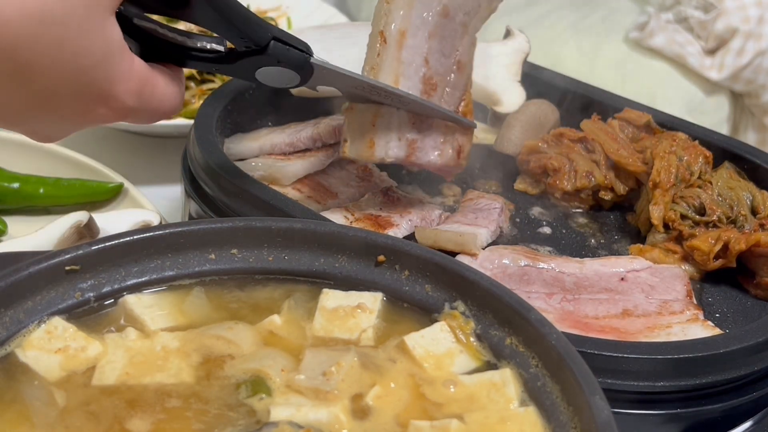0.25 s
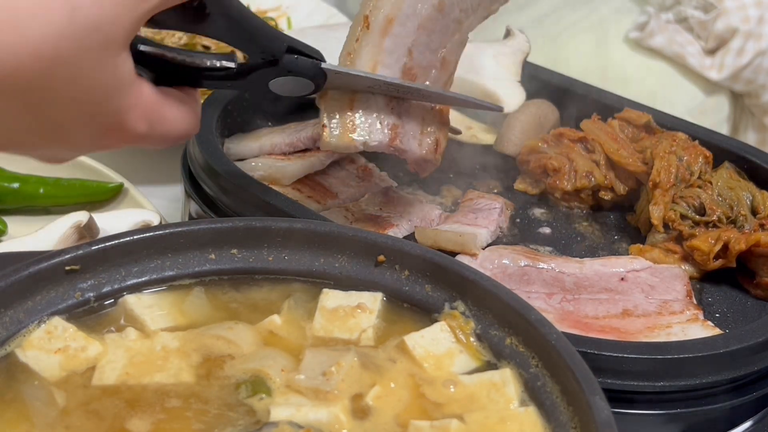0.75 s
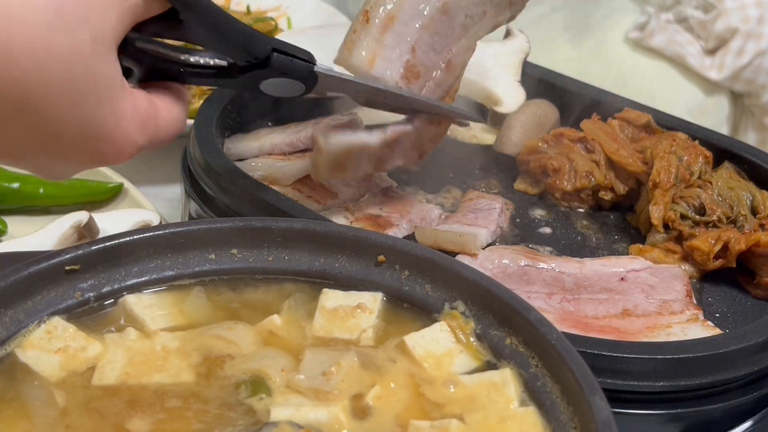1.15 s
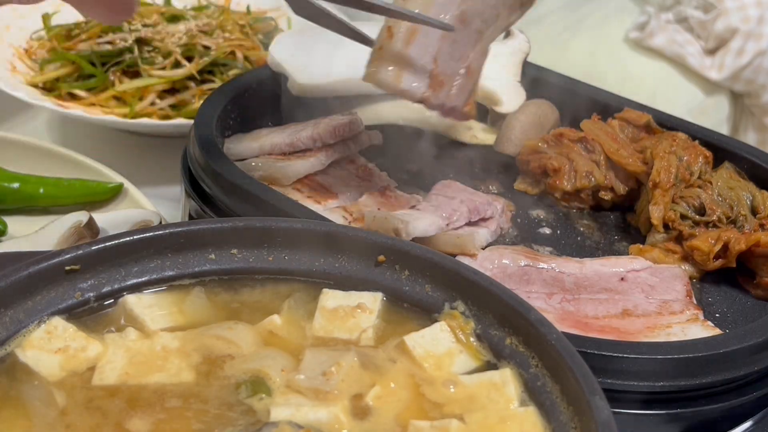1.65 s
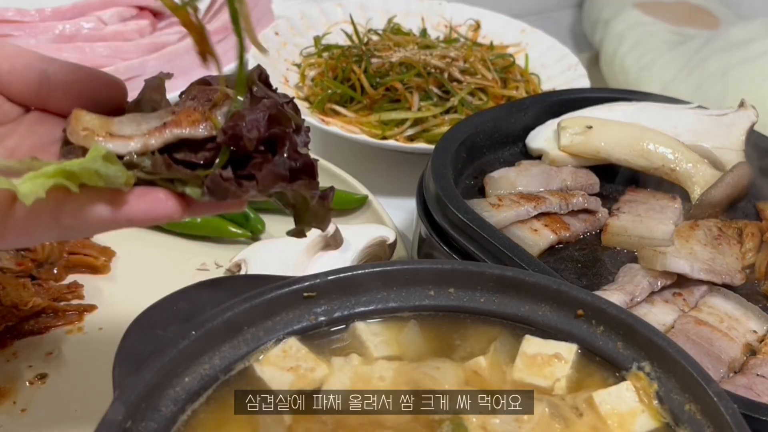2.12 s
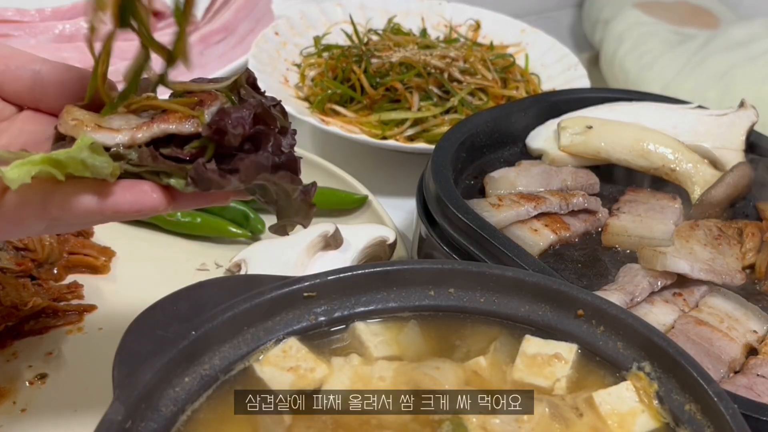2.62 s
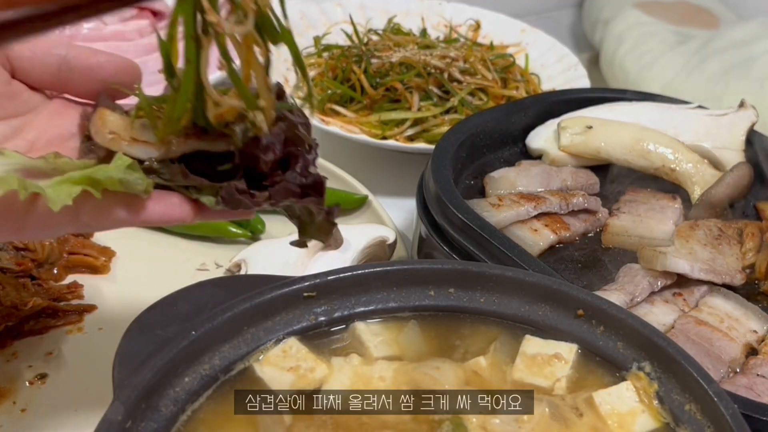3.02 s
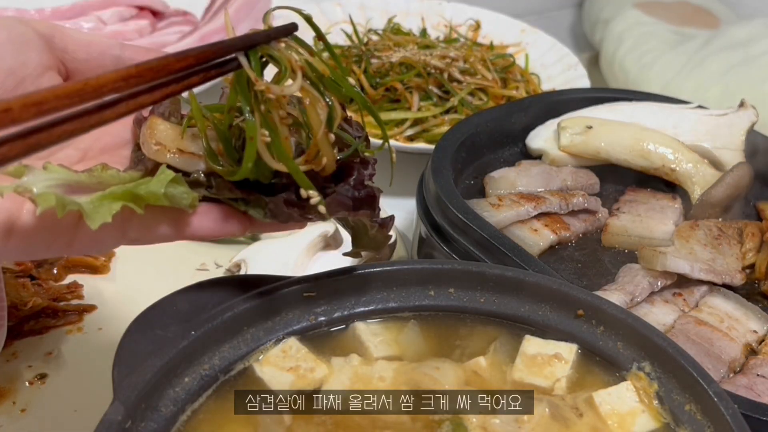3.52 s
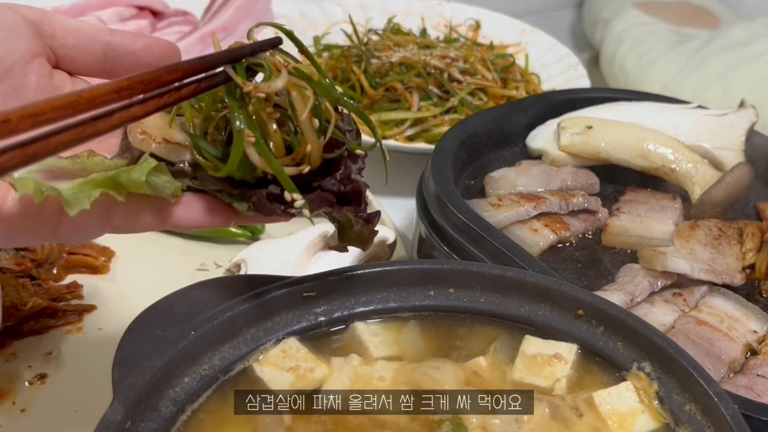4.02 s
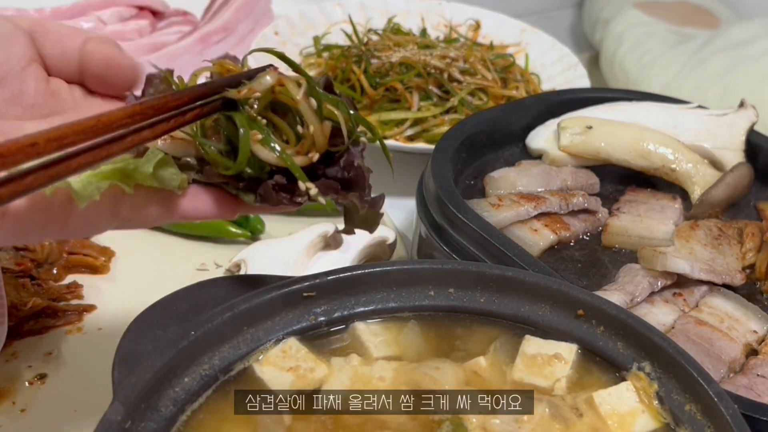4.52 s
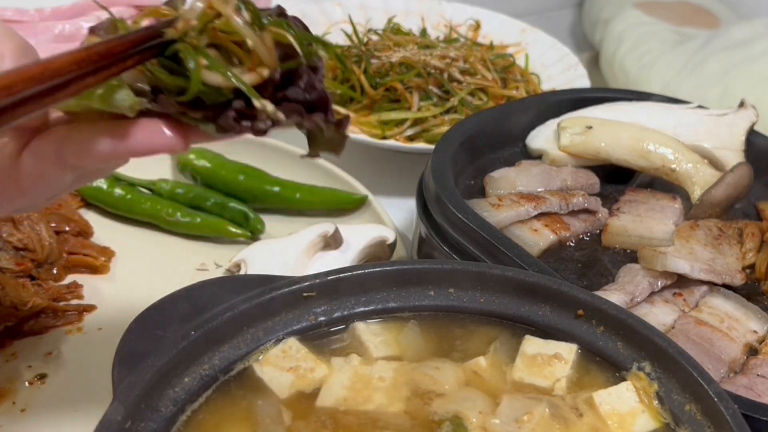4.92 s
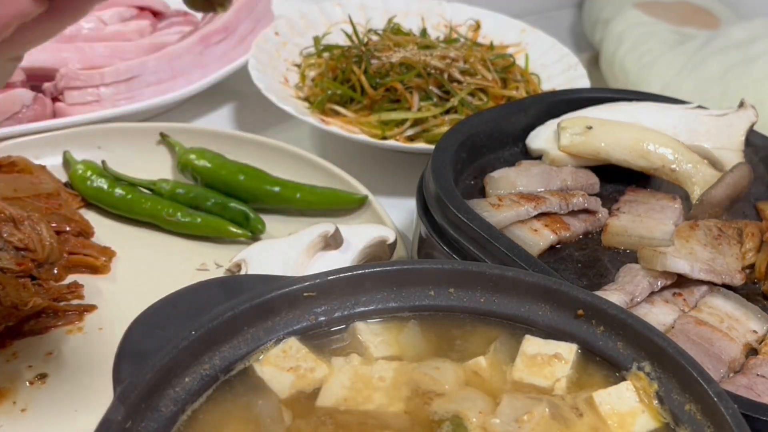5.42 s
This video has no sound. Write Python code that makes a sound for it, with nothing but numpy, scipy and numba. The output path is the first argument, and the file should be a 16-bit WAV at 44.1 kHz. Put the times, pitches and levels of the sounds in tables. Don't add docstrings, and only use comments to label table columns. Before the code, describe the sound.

Pork fat sizzles briskly up close with wet spits and pops, then abruptly drops to a softer, ticking crackle from across the table.

```python
import sys
import numpy as np
from scipy import signal
from scipy.fft import rfft, irfft
from scipy.io import wavfile
from scipy.ndimage import uniform_filter1d
from numba import njit

SR = 44100
rng = np.random.default_rng(int(sys.argv[2]) if len(sys.argv) > 2 else 0)


def dump(signal):
    limited = np.clip(np.atleast_2d(signal).T, -1, 1)
    pcm = np.round(limited * 32767).astype(np.int16)
    wavfile.write(sys.argv[1], SR, pcm)


def invert_db(level):
    return 10 ** (np.asarray(level, dtype=float) / 20)


N = 249606
CHANGE_S = 1.7692


def level(x, db):
    return x * invert_db(db) / np.sqrt(np.mean(x ** 2))


def colour(x, points):
    hz, db = np.transpose(points)
    f = np.fft.rfftfreq(2048, 1 / SR)
    log_gain = np.interp(np.log(f + 1), np.log(hz), db) * np.log(10) / 20
    cepstrum = irfft(log_gain)
    cepstrum[1:1024] *= 2
    cepstrum[1025:] = 0
    response = irfft(np.exp(rfft(cepstrum)))[:1024]
    return signal.fftconvolve(x, response)[:N]


@njit
def rings(start, hz, t60, size, n):
    out = np.zeros(n)
    for k in range(len(start)):
        turn = np.exp((2j * np.pi * hz[k] - np.log(1000) / t60[k]) / SR)
        z = size[k] + 0j
        end = min(n, start[k] + int(t60[k] * SR) + 1)
        for i in range(start[k], end):
            out[i] += z.real
            z *= turn
    return out


def walk(rate):
    hold = int(SR / rate)
    steps = np.repeat(rng.standard_normal(N // hold + 1), hold)
    return 1.3 * uniform_filter1d(uniform_filter1d(steps, hold), hold)[:N]


def smear(x, t60, db):
    t = np.arange(1, 2000) / SR
    tail = level(rng.standard_normal(len(t)) * 1000 ** (-t / t60), -28.0)
    return x + invert_db(db) * signal.fftconvolve(x, tail)[:N]


def bubbles(count, cycles, spread_db, patchy_db):
    when, pitch, big, sign = rng.random((count, 4)).T
    start = (when * N).astype(int)
    hz = 600 + pitch * 16500
    flurry = 1.17 * walk(30) + walk(90)
    burst_db = -spread_db * np.log(1 - big) + patchy_db * flurry[start]
    size = invert_db(np.minimum(burst_db, 16)) * np.sqrt(hz)
    return level(rings(start, hz, cycles / hz, size * np.sign(sign - .5), N), 0)


def frying_layers():
    hiss = rng.standard_normal(N) * invert_db(2.0 * walk(40))
    fizz = bubbles(count=30000, cycles=7.3, spread_db=2.0, patchy_db=0.5)
    crackle = smear(bubbles(count=4000, cycles=2.3, spread_db=2.0, patchy_db=1.5), 0.004, -3.5)
    ticks = smear(bubbles(count=2500, cycles=6.2, spread_db=3.5, patchy_db=1.0), 0.0025, -18.5)
    return np.array([hiss, fizz, crackle, ticks])


# time in seconds, level in dB, treble lift in dB.
FAT_HEAT = [
    [(0.0, -35, 3), (0.294, -36.5, 2), (1.602, -34.5, 1.5), (1.734, -35, 2.5), (1.76, -35, 1)],
    [(1.8, -49.5, -1), (2.51, -50.5, 1), (2.7, -50, -0.5), (3.79, -50.5, -1.5), (4.16, -49.5, 0.5),
     (4.69, -51, 2), (5.66, -49, -1)],
]
# pitch in Hz, strength in dB per Hz.
COLOUR_NEAR = [(150, -15.5), (500, -16.5), (1000, -8), (1500, -3), (1750, 2), (2400, -0.5), (3200, 4.5),
               (3700, 0), (5000, 1.5), (6300, -2.5), (8500, 2), (11000, -1), (13000, -2), (15500, 1.5)]
# pitch in Hz, strength in dB per Hz.
COLOUR_FAR = [(150, -50), (1050, -10), (1280, 3.5), (1550, 4), (2200, 0.5), (2900, 0), (4500, 2.5),
              (6000, 0), (8000, 1), (10000, 0.5), (12000, -2.5), (12900, -5.5), (14200, -2.5),
              (15500, -0.5)]
# hiss, fizz, crackle and ticks, all in dB.
LAYER_MIX = [(-3, -2.5, -7, -14), (-5.5, -3, -3, -4)]


def frying(place, layers):
    t = np.arange(N) / SR
    s, heat_db, lift_db = np.transpose(FAT_HEAT[place])
    heat = invert_db(np.interp(t, s, heat_db) + 6.5)
    lift = invert_db(np.interp(t, s, lift_db))
    mixed = invert_db(np.array(LAYER_MIX[place])) @ layers
    fat = level(colour(mixed, (COLOUR_NEAR, COLOUR_FAR)[place]), 0)
    high_pass = signal.butter(2, 7500, "high", fs=SR, output="sos")
    treble = signal.sosfiltfilt(high_pass, fat)
    return heat * (fat + (lift - 1) * treble)


# pitch in Hz, strength in dB per Hz.
ROOM_COLOUR = [(100, -2), (200, -2), (350, -4.5), (600, -4), (1000, -1), (1500, -10), (3000, -28)]


def room_hum():
    return colour(rng.standard_normal(N), ROOM_COLOUR)


# time in seconds, force in dB, length of the push in milliseconds.
FOOTFALLS = [(0.471, -48, 8.2), (.76, -46, 9.3), (0.998, -49.5, 8.9), (1.221, -62, 5.6),
             (1.377, -41.5, 5.1), (1.68, -57, 8.7), (3.674, -56, 2.8), (3.71, -55, 5.9), (4.83, -63, 6),
             (4.91, -55, 3), (4.954, -42.5, 8.2), (5.442, -67, 4)]


def shudder(t):
    rest_near_db, rest_far_db = -61, -65.5
    after_db, settle_t60_s = -13, 1.9
    power = invert_db(np.where(t < CHANGE_S, rest_near_db, rest_far_db)) ** 2
    for s, db, ms in FOOTFALLS:
        tremble_db = db + after_db - 60 * np.abs(t - s) / settle_t60_s
        power = power + (t > s) * invert_db(tremble_db) ** 2
    return np.sqrt(power)


# pitch in Hz, level in dB, time to fade by 60 dB in seconds.
BOOM_NOTES = [(27.1, -7.5, 2.1), (28, -11, 2.3), (50.1, -2, 0.83), (56.16, 0, 1.3), (78.7, 1.5, 1.2),
              (85.34, 1, 0.87), (108, 1.5, 0.61), (144, 4, 0.18), (185, -5, 0.12)]


def floor(heard):
    t = np.arange(N) / SR
    push = rng.standard_normal(N) * shudder(t) * invert_db(-39.5)
    for s, db, ms in FOOTFALLS:
        push = push + invert_db(db - 0.5) * np.exp(-(2000 * (t - s) / ms) ** 2) * 2000 / (ms * SR)
    boom = np.zeros(N)
    for k, (hz, db, t60) in enumerate(BOOM_NOTES):
        pole = np.exp((2j * np.pi * hz - np.log(1000) / t60) / SR)
        ring = signal.lfilter([1], [1, -pole], push * heard).imag
        boom = boom + (-1) ** k * invert_db(db) * ring
    lean_db = .3
    return boom * invert_db(np.array([[lean_db], [-lean_db]]))


def spits(rows):
    s, db, hz, slap_db, splash_db, spray_db = np.transpose(rows)
    start = (s * SR).astype(int) + 20
    one = np.ones(len(s))

    def burst(burst_db, t60):
        puff = rings(start, 0 * one, t60 * one, invert_db(db + burst_db), N)
        return uniform_filter1d(puff, size=19, origin=9) * np.sign(rng.standard_normal(N))

    slap = burst(1.65 * slap_db + 34.0, 0.021)
    slap = colour(slap, [(150, -15.5), (350, -8.0), (1300, -5.5), (2500, -24)])
    splash = burst(splash_db + 11.5, 0.0045)
    splash = colour(splash, [(600, -29), (1600, -1), (4000, -3.5), (7000, -18.0), (10000, -30)])
    spray = colour(burst(spray_db + 8, 0.0056), [(3000, -19), (7000, 2.5), (10000, 2.5)])
    ring = rings(start + 10, hz, 0.0053 + 8 / hz, invert_db(db - 7), N)
    ring = colour(ring, [(300, -22), (1200, 1.0)])
    snap = rings(start + 10, 0 * one, 1e-5 * one, invert_db(db - 10 + (splash_db + 9)), N)
    snap = colour(snap, [(500, -18), (1600, -7), (6000, 1), (12000, -12)])
    return smear(slap + splash + spray + ring + snap, 0.036, -14.5)


# share of a 4 kHz bubble in dB, change in dB per octave
# (wider bubbles ring lower and splash more), change in dB per dB of slap.
SPLASH_SHARE = [(-8, -1.5, 0), (-12.5, -1.5, .5)]


def with_splash(place, *tables):
    s, db, hz, slap_db, spray_db = np.vstack(tables).T
    base_db, octave_db, wet = SPLASH_SHARE[place]
    splash_db = base_db + octave_db * np.log2(hz / 4000) + wet * (slap_db + 26)
    return np.transpose([s, db, hz, slap_db, splash_db, spray_db])


# peak, scatter, slap and spray, all in dB.
SMALL_SPITS = [(-21.5, -2.5, -22.5, -25), (-39, 6, -29, -9.5)]
# five pitches in Hz, first near and then far.
HOLLOWS = [(2000, 3000, 2800, 6200, 5300), (1450, 1960, 4700, 4600, 5200)]


def small_spits(place, start_s, end_s, count):
    when, pick = rng.random((count, 2)).T
    loud, detune, slap, spray = rng.standard_normal((count, 4)).T
    db, scatter_db, slap_db, spray_db = SMALL_SPITS[place]
    hollows = np.array(HOLLOWS[place])
    hz = hollows[(pick * len(hollows)).astype(int)] * (1 + .05 * detune)
    return np.transpose([start_s + when * (end_s - start_s),
                         db + scatter_db * np.minimum(loud, 1),
                         hz,
                         slap_db + 5.0 * np.minimum(slap, .5),
                         spray_db + 2.8 * spray])


# start in seconds, peak in dB, ring in Hz, shares of slap and spray in dB.
WET_SPITS_NEAR = [(0.0459, -18, 6400, -28, 1.5), (0.0721, -18, 3900, -15.5, -17),
                  (0.106, -16, 4900, -31, -16), (0.1802, -17, 2730, -24, -17),
                  (0.224, -16, 4540, -23, -7.5), (.356, -12, 1950, -26, -27), (.466, -8.5, 2600, -27, -10),
                  (0.5568, -18.5, 2600, -23, -6), (0.3331, -20.5, 2880, -30, -2.5),
                  (.369, -17, 4860, -23, -12), (0.6969, -11, 2530, -20, -12), (.774, -23, 3200, -28, -22),
                  (0.8886, -16, 5500, -21, -8.5), (.8924, -23, 3060, -31, -4),
                  (0.9377, -18.5, 5400, -22, -6), (1.0225, -10.5, 3070, -23.5, -40),
                  (1.054, -18, 1930, -31, -27), (1.0815, -17, 4300, -24, -23),
                  (1.2875, -11.5, 3170, -29, -12.5), (1.3615, -20, 3070, -32, -28),
                  (1.4643, -16, 3060, -31, -6), (1.4778, -16, 4400, -31, -5),
                  (1.5309, -14, 5250, -17.5, -11.5), (1.728, -18, 4780, -34, -21)]


def spits_near():
    return spits(with_splash(0, WET_SPITS_NEAR, small_spits(0, 0, CHANGE_S, count=20)))


# start in seconds, peak in dB, ring in Hz,
# shares of slap and spray in dB.
WET_SPITS_FAR = [(2.0854, -21, 6900, -22.5, -10.5), (2.4628, -42, 2150, -29, 8),
                 (2.6955, -42, 1210, -14.5, 5), (2.826, -31, 1530, -18, -4.5),
                 (2.952, -34.5, 1640, -20, 0.5), (3.0156, -32, 4660, -24, -9),
                 (3.036, -26.5, 1740, -18, -25), (3.266, -29, 4470, -29, -11), (3.4945, -46, 2850, -19, 9),
                 (3.5116, -21, 4100, -24, -13), (3.5819, -25, 4500, -24.5, -9.5),
                 (3.919, -17, 6700, -23, -19), (4.044, -32, 3760, -34, -3.5),
                 (4.2947, -23.5, 3270, -30, -11), (4.3997, -28.5, 2010, -23, -6.5),
                 (4.5556, -28, 3940, -34, -6), (4.599, -31, 3920, -32, -7), (4.7108, -27, 1450, -26, -1),
                 (4.9706, -26.5, 2180, -28, -9), (5.1316, -25.5, 4400, -24, -4),
                 (5.1725, -26, 1980, -26, -6), (5.278, -30, 1820, -25, -8), (5.486, -26, 4930, -28, -8),
                 (5.6423, -33.5, 1370, -26, -2.5)]
# start in seconds, peak in dB, ring in Hz.
DRY_TICKS = [(2.182, -28, 2000), (2.1938, -16, 4670), (2.2769, -21.5, 6470), (2.5436, -20.5, 5900),
             (2.5606, -24, 6600), (2.6015, -22.5, 4630), (2.6265, -21, 6500), (2.7382, -31, 4770),
             (2.872, -26, 6550), (2.9523, -30, 4810), (3.104, -26, 5100), (3.1523, -26, 4700),
             (3.34, -25, 5540), (3.4391, -28, 6100), (3.462, -24, 5860), (3.4957, -21, 4880),
             (3.882, -26, 4680), (4.0627, -23, 3880), (4.2348, -27, 4670), (4.2572, -21.5, 6140),
             (4.37, -20, 5950), (4.4605, -23, 5650), (4.7406, -29, 3830), (4.8121, -24, 4560),
             (4.9292, -22.5, 6100), (5.0693, -24, 4800), (5.2196, -25, 6460), (5.2645, -18.5, 5400),
             (5.3876, -21, 5370), (5.5478, -20.5, 4880)]


def spits_far():
    ticks = [(s, db, hz, -37.5, -17.5) for s, db, hz in DRY_TICKS]
    small = small_spits(1, CHANGE_S, N / SR - .01, count=70)
    return spits(with_splash(1, WET_SPITS_FAR, ticks, small))


# pitch in Hz, lead of the right port in radians,
# share heard alike near and then far, each from 0 to 1.
PORT_PAIR = [(100, 0, .97, .93), (600, 0, .82, .35), (1200, 0, .6, .7), (1620, 0, .0, .3),
             (1800, 0, .96, .8), (2300, 0, .985, .98), (3300, -.1, .975, .8), (5000, 0, .99, .6),
             (5400, .8, .85, .5), (6900, 1.3, .85, .7), (7800, 2.6, .96, .95), (8250, 3.05, .995, .98),
             (8750, 3.25, .995, .98), (9150, 3.7, .95, .93), (10900, 5.6, .96, .96),
             (11200, 6.2, .997, .995), (12700, 6.36, .997, .997), (13050, 6.95, .96, .98),
             (15200, 9.35, .98, .97), (18000, 9.45, .99, .98)]


def ports(alike, unlike, place):
    table = np.array(PORT_PAIR)
    f = np.fft.rfftfreq(N, 1 / SR)
    turn = np.exp(.5j * np.interp(f, table[:, 0], table[:, 1]))
    share = np.clip(np.interp(f, table[:, 0], table[:, 2 + place]), 0, 1)
    same = rfft(alike) * np.sqrt((1 + share) / 2)
    opposite = rfft(unlike) * np.sqrt((1 - share) / 2)
    return irfft([(same + opposite) / turn, (same - opposite) * turn], N)


def scene():
    t = np.arange(N) / SR
    near = np.clip((CHANGE_S - t) / .002 + .5, 0, 1)
    patches = [frying_layers(), frying_layers()]
    hums = [room_hum(), room_hum()]
    out = 0
    for place, here in enumerate([near, 1 - near]):
        hum_db = (-51, -58)[place]
        alike, unlike = [frying(place, patch) + level(hum, hum_db) for patch, hum in zip(patches, hums)]
        pops = (spits_near, spits_far)[place]()
        scattered = smear(pops, .005, 0) - pops
        heard = ports(alike + pops, unlike + scattered, place)
        out = out + here * (heard + floor(here))
    return out


def band_limit(x):
    return signal.sosfilt(signal.butter(12, 16420, fs=SR, output="sos"), x)


def record(dry):
    rumble_cut = signal.butter(2, 42, "high", fs=SR, output="sos")
    top_cut = signal.ellip(12, .3, 60, 15720, fs=SR, output="sos")
    mix = signal.sosfilt(top_cut, signal.sosfilt(rumble_cut, dry))
    return band_limit(mix)


dry = scene()
out = record(dry)
dump(out)
```